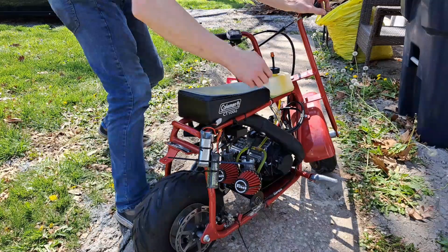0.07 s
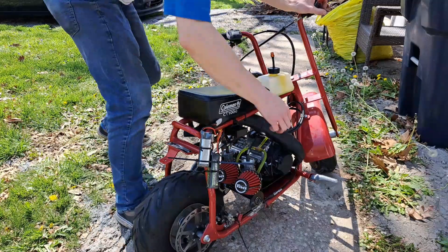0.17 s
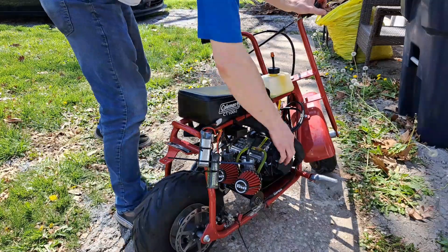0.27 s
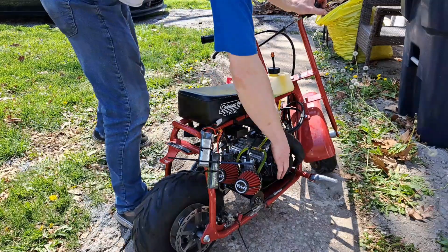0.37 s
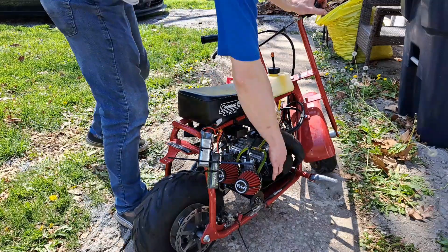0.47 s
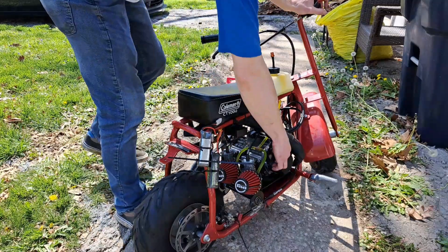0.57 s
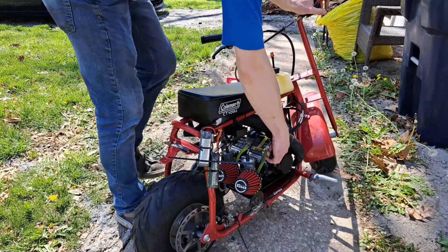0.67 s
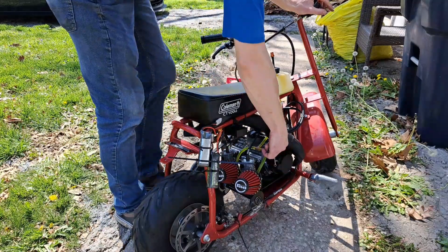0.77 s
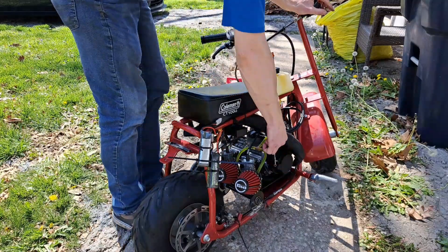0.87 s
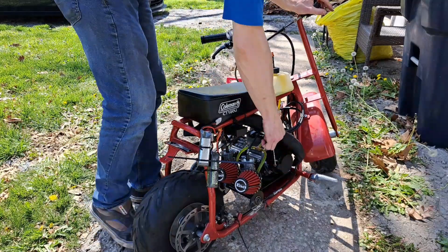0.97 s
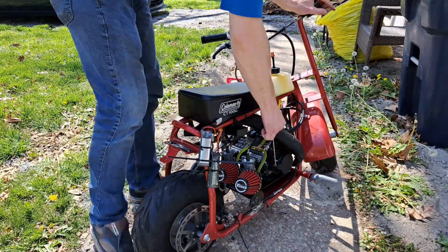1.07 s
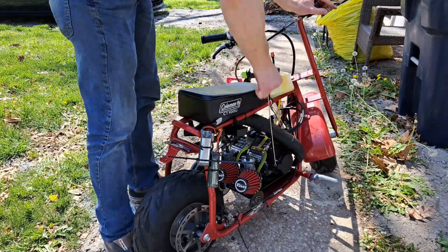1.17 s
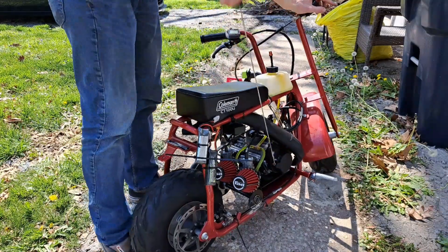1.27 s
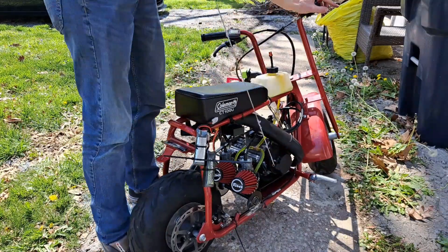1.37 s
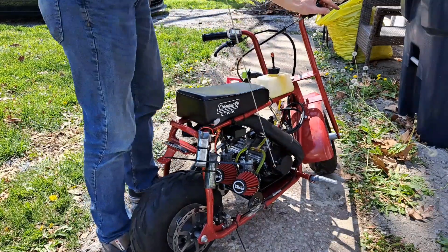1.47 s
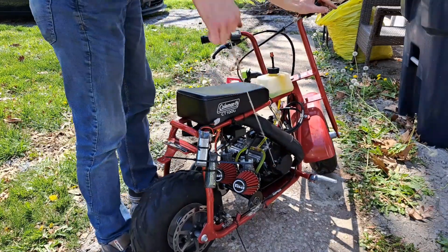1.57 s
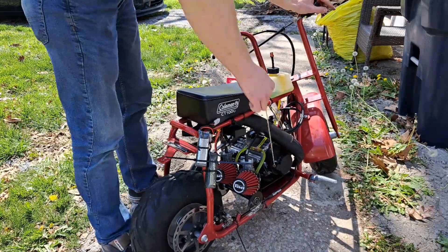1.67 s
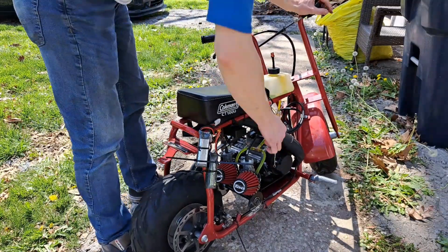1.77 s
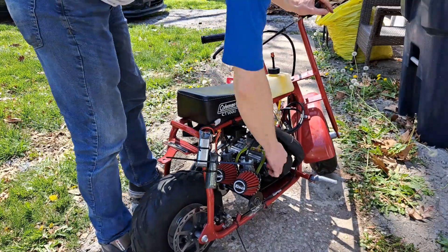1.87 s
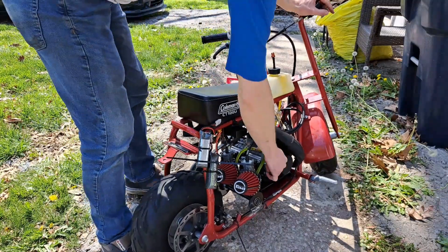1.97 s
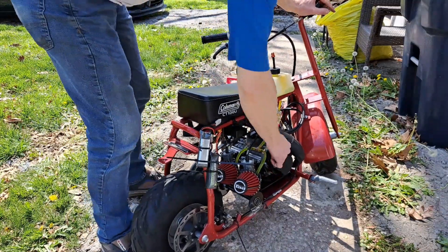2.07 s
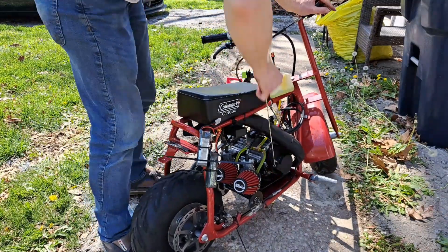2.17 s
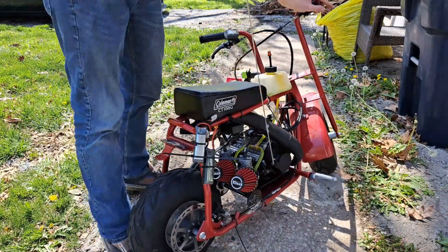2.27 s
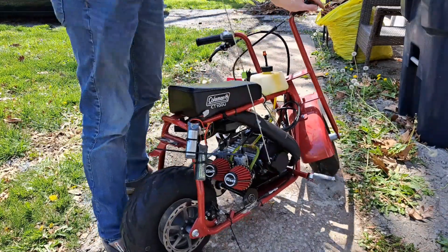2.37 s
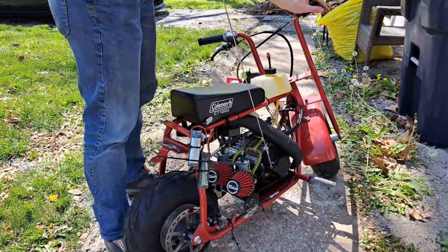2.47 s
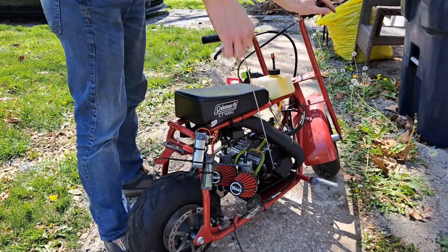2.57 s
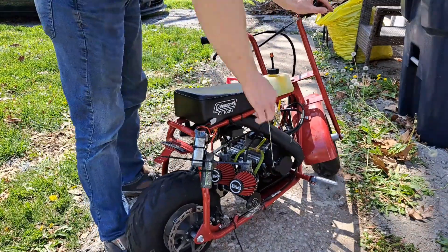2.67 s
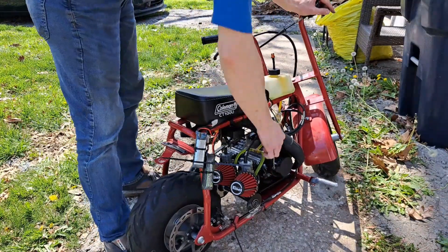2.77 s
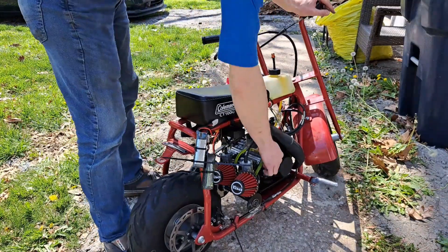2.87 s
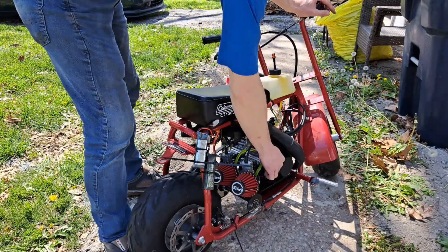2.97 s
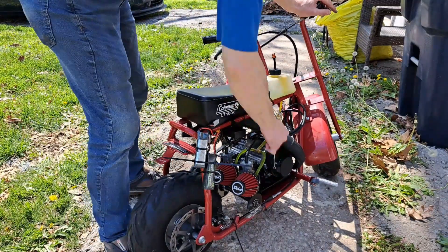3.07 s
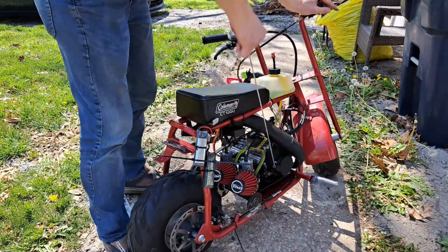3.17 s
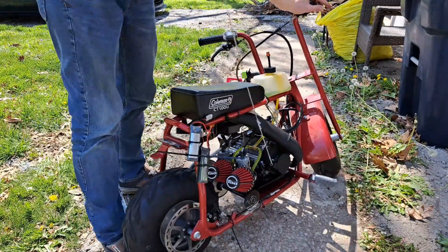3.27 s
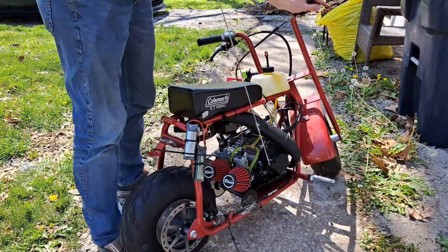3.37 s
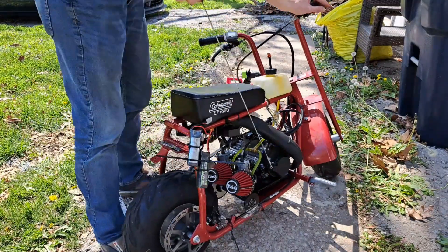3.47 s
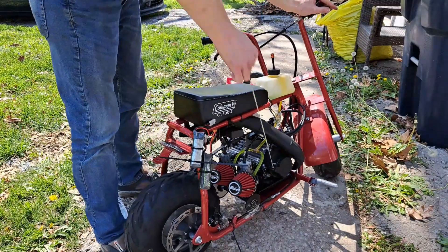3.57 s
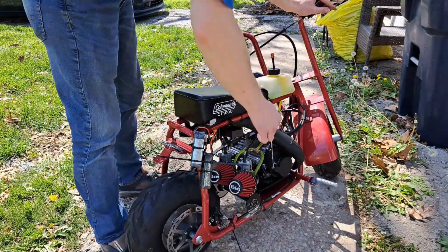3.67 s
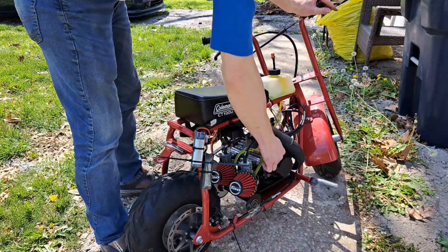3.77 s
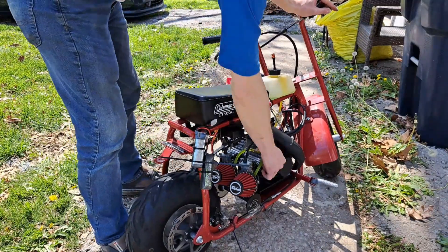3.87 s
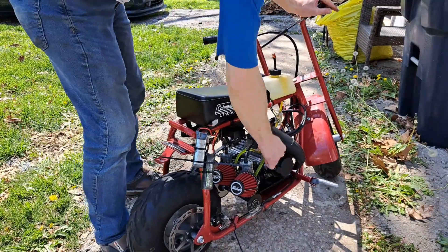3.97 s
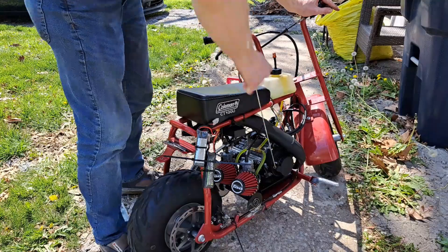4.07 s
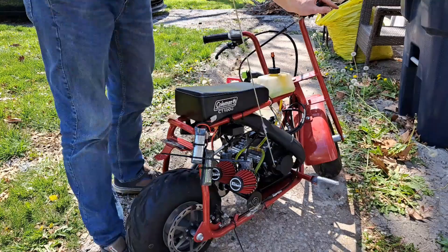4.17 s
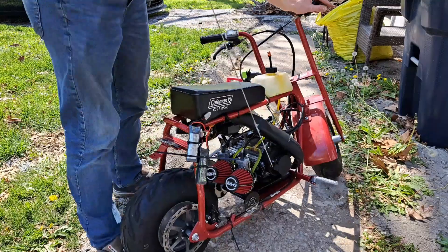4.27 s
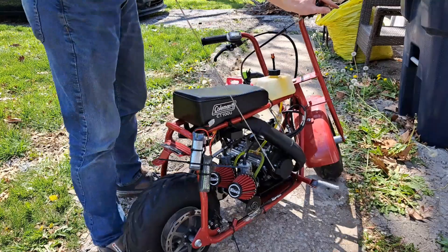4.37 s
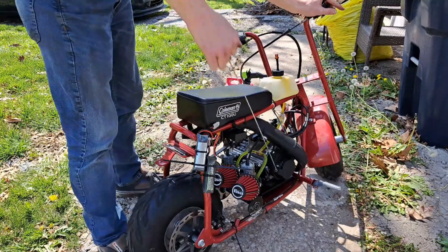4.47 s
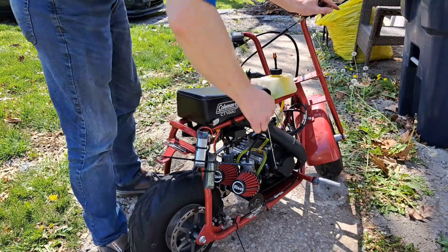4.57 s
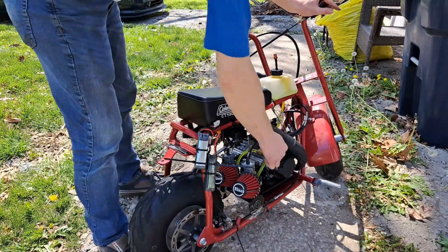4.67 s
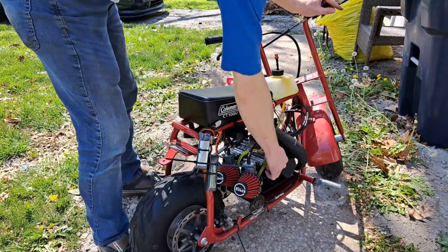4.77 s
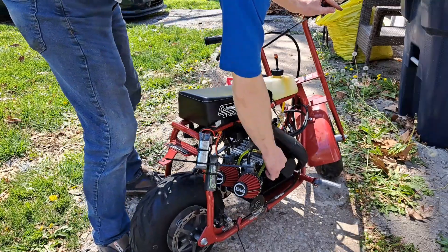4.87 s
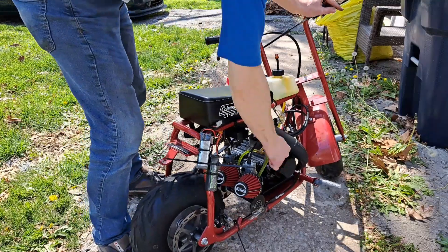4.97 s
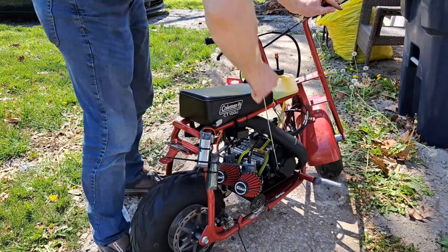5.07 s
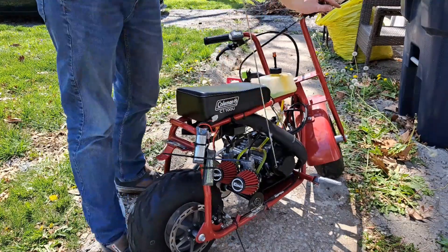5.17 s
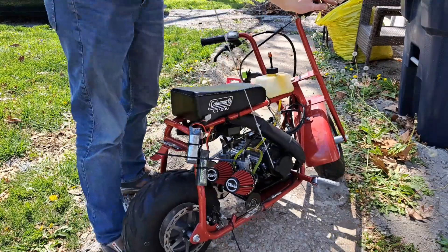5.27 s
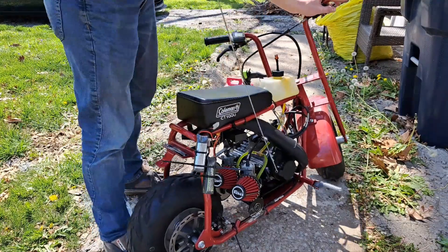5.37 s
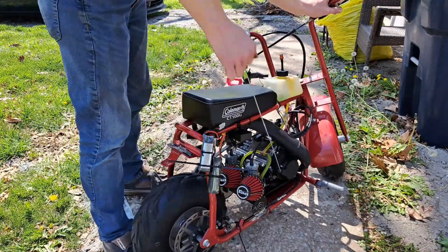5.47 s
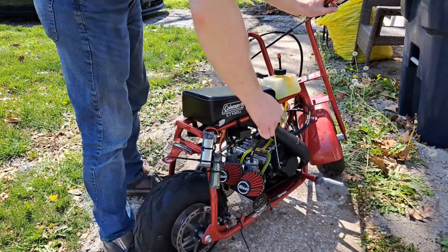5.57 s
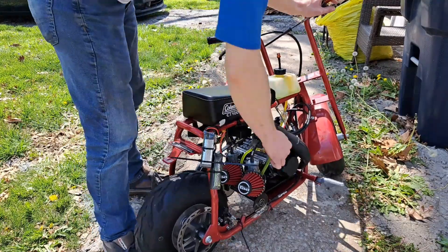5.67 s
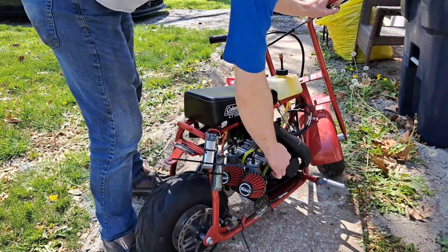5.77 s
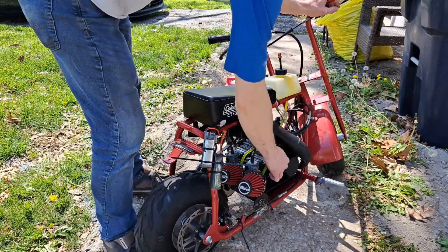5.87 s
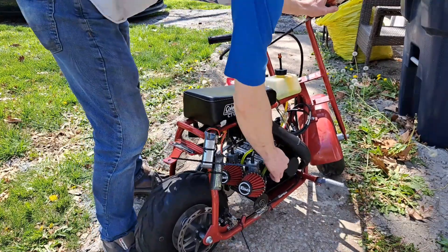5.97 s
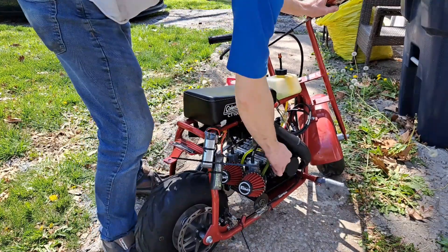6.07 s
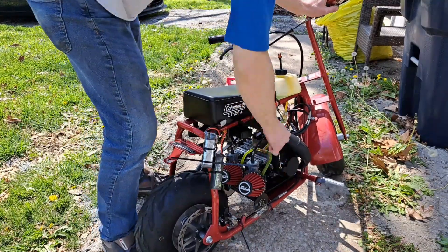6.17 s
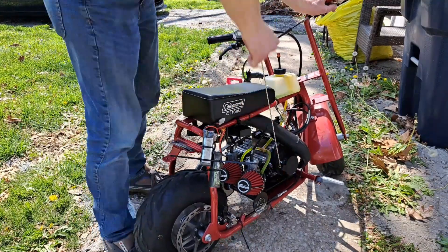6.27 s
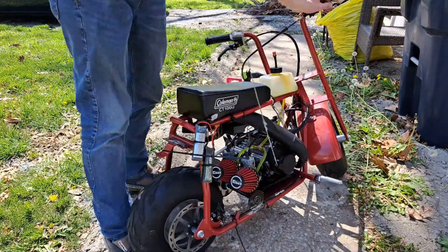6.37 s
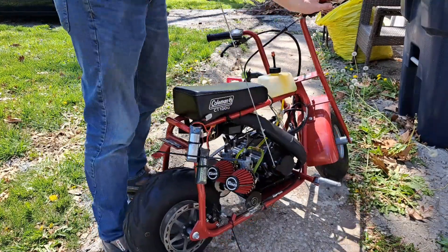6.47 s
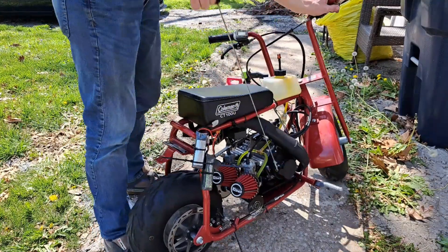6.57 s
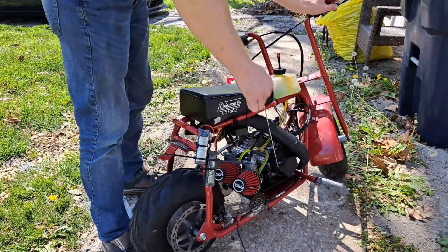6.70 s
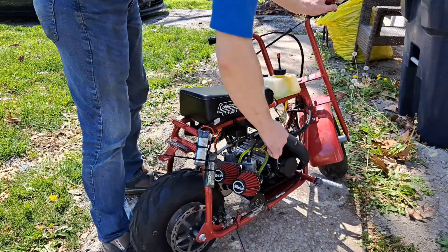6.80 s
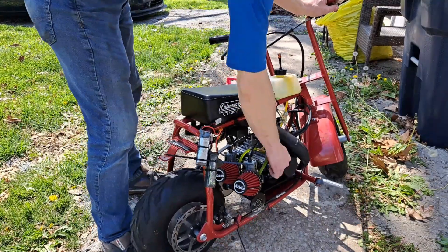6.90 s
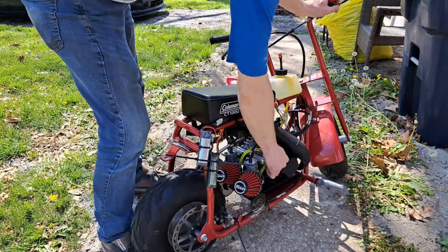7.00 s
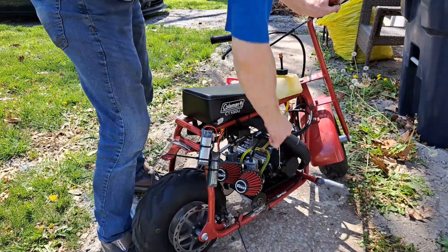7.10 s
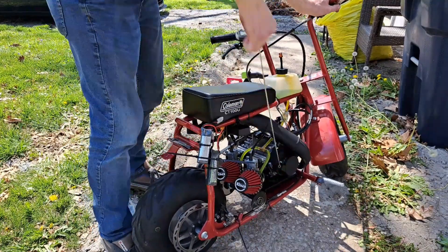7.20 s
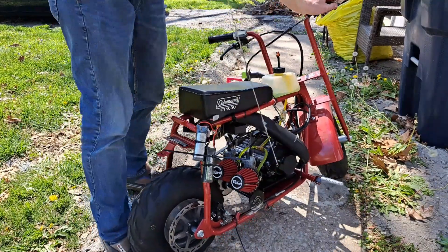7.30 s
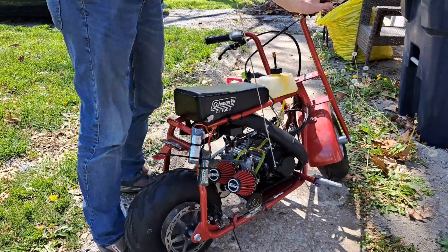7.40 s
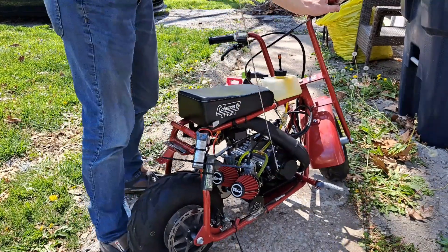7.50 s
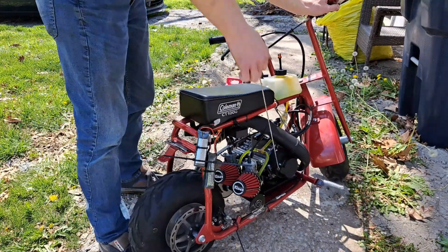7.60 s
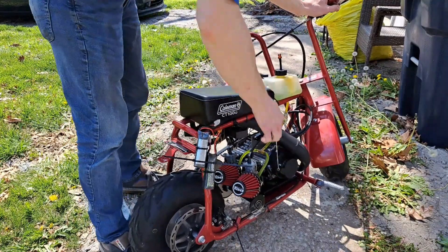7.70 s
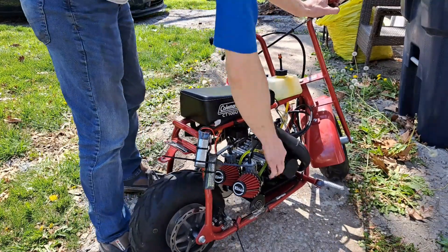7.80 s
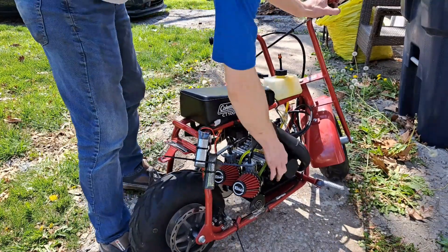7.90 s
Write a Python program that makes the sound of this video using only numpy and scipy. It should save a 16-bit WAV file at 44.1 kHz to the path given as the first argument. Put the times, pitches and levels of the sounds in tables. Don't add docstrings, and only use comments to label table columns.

```python
import sys
import numpy as np
from scipy import signal
from scipy.fft import rfft, irfft
from scipy.io import wavfile
from scipy.ndimage import uniform_filter1d

SR = 44100
rng = np.random.default_rng(int(sys.argv[2]) if len(sys.argv) > 2 else 0)


def boost_factor(decibels):
    exponent = np.asarray(decibels, float) / 20
    return 10 ** exponent


def waveform_to_disk(signal):
    frames = np.transpose(np.atleast_2d(signal))
    scaled = np.clip(frames, -1, 1) * 32767
    samples = np.round(scaled).astype(np.int16)
    wavfile.write(sys.argv[1], SR, samples)


N = 350154
TIME = np.arange(N) / SR

# (cord taut [s], stroke [s], whirr [dB], shroud hoot [dB], frame shake [dB])
STROKES = [(1.26, 0.25, -11, -18.5, -10.5), (2.235, 0.22, -12, -17.5, -11),
           (3.205, 0.25, -11.5, -15.5, -11.5), (4.13, 0.2, -14, -16.5, -9), (5.15, 0.2, -13, -17, -10),
           (6.305, 0.23, -14.5, -14, -10.5), (7.235, 0.22, -13.5, -11.5, -11.5)]
# (first tooth [s], last tooth [s], last gap [ms], rattle [dB], every other tooth [dB])
COASTING = [(1.574, 1.916, 43.5, -8.5, 2), (2.442, 2.896, 43.4, -9, 0.5), (3.568, 3.849, 44.3, -9, 0),
            (4.426, 4.765, 38.4, -10, 1.5), (5.428, 5.768, 45, -9.5, -1.5), (6.599, 6.934, 36.2, -9.5, 1.5),
            (7.54, 7.892, 45, -10, 0.5)]
# (frequency [Hz], width [Hz], level [dB])
HOUSING_MODES = [(1623, 28, -1.5), (2314, 89, 2.5), (2666, 190, 1), (3856, 88, 2), (4710, 130, 5.5),
                 (5024, 58, 7.5), (6820, 76, -4), (8930, 90, -6.5), (10580, 1500, -8.5)]
# (frequency [Hz], width [Hz], level [dB])
CRANKCASE_MODES = [(679, 18, -0.5), (810, 120, -3), (990, 35, -8)]
# (frequency [Hz], density [dB per Hz])
IMPACT_SPECTRUM = [(150, -63.5), (250, -5.5), (474, -21.5), (583, -5.5), (1850, -4.5), (2320, -5),
                   (4100, -3.5), (4790, -7), (13000, -19), (15500, -13)]


def unit(x):
    return x / np.sqrt(np.mean(x ** 2))


def noise():
    return rng.standard_normal(N)


def band(x, lo_hz, hi_hz, order=3):
    return signal.sosfilt(signal.butter(order, [lo_hz, hi_hz], "band", fs=SR, output="sos"), x)


def colour(x, points):
    hz, db = np.transpose(points)
    grid_hz = np.arange(1025) * SR / 2048 + 1
    log_gain = np.interp(np.log(grid_hz), np.log(hz), db) * np.log(10) / 20
    cepstrum = irfft(log_gain)
    cepstrum[1:1024] *= 2
    cepstrum[1025:] = 0
    impulse = irfft(np.exp(rfft(cepstrum)))
    return signal.fftconvolve(x, impulse)[:N]


def modes(x, table):
    return sum(boost_factor(db) * signal.lfilter(*signal.iirpeak(hz, hz / width, SR), x) for hz, width, db in table)


def walk(rate):
    k = int(SR / rate)
    steps = np.repeat(rng.standard_normal(N // k + 1), k)
    return 1.18 * uniform_filter1d(steps, k)[:N]


def add(out, s, piece):
    i = max(int(s * SR), 0)
    out[i:i + len(piece)] += piece[:N - i]


def ramp(s, length, up, down):
    return np.minimum(np.minimum((TIME - s) * up, (s + length - TIME) * down), 0)


def bursts(table, rise, fall, scatter_db):
    t, out = np.arange(9000) / SR, np.zeros(N)
    for (s, db), chance in zip(table, rng.standard_normal(len(table))):
        dying = np.exp(-t / (fall * boost_factor(scatter_db * chance)))
        dying += 0.09 * np.exp(-t / (2.6 * fall))
        add(out, s - rise / 2, boost_factor(db) * (1 - np.exp(-t / rise)) * dying)
    return out


def patchy(x, rate, depth_db):
    edges = 300 * 2. ** np.arange(7) * [1, 1, 1, 1, 1, 1, .84]
    out = 0
    for k in range(6):
        octave = band(x, edges[k], edges[k + 1], order=2)
        out = out + (-1) ** k * octave * boost_factor(depth_db * walk(rate))
    return out


def rustle():
    # (time [s], length [s],
    # dull rustle [dB], bright rustle [dB])
    movements = [(0, 0.26, -36, -37), (0.113, 0.045, -28.5, -33.5), (0.163, 0.038, -61.5, -39.5),
                 (0.359, 0.053, -51.5, -42), (0.448, .09, -57, -56), (0.555, 0.035, -50.5, -39),
                 (0.584, 0.19, -49, -41.5), (0.873, 0.084, -30, -33.5), (1.0, 0.12, -49, -79),
                 (1.172, 0.056, -15, -29), (1.92, 0.015, -13.5, -37), (1.97, 0.11, -27.5, -50.5),
                 (2.094, 0.21, -20, -44), (2.924, 0.026, -21, -64), (3, 0.078, -38, -40),
                 (3.074, 0.034, -19.5, -53), (3.138, 0.044, -28, -36), (3.91, 0.11, -58, -44),
                 (4.004, 0.13, -25, -36), (4.797, .02, -30.5, -60.5), (4.853, 0.12, -64, -97),
                 (5.006, 0.029, -30.5, -68), (5.098, 0.034, -23.5, -43.5), (5.88, 0.44, -62.5, -70.5),
                 (6.244, .04, -57, -70), (6.956, 0.0077, -18.5, -42), (7.0, 0.046, -67, -49.5),
                 (7.098, 0.15, -27.5, -44.5)]
    # (frequency [Hz], density [dB per Hz])
    cloth_spectrum = [(300, -16), (600, -15.5), (1800, -20), (4500, -32.5), (15500, -12)]
    # (frequency [Hz], width [Hz], level [dB])
    grip_modes = [(2590, 150, -5.5), (3640, 590, -0.5), (5900, 2200, 8.5), (10030, 500, 7.5),
                  (13200, 1500, 6)]
    dull, bright = np.zeros(N), np.zeros(N)
    for s, length, dull_db, bright_db in movements:
        move = boost_factor(ramp(s, length, 592.5, 448.5))
        dull += move * boost_factor(dull_db)
        bright += move * boost_factor(bright_db)
    slips = noise() * boost_factor(1.8 * walk(50) + 2.5 * walk(400))
    cloth = unit(colour(slips, cloth_spectrum)) + 1.2 * unit(modes(slips, grip_modes))
    low = dull * boost_factor(-9.5) * unit(band(cloth, 370, 2700))
    return low + bright * boost_factor(-3.5) * unit(band(cloth, 6300, 19000))


def hiss():
    return boost_factor(-92.5) * band(noise(), 200, 4000, order=1)


def frame_tremble():
    # (time [s], length [s], level [dB], decay [dB per s])
    tremors = [(0, 0.013, -11.5, 126), (0.527, 0.05, -50.5, 151.5), (1.08, 0.52, -22.5, 231),
               (2.44, 0.048, -14.5, 61), (3.393, 0.24, -25.5, 193), (4.348, 0.14, -18, 220),
               (5.35, 0.054, -24, 124), (5.568, 0.13, -30, 197), (6.536, 0.24, -24, 290),
               (7.45, 0.26, -25, 270)]
    still_db = -62.5
    level = boost_factor(still_db) + sum(boost_factor(db + ramp(s, length, 210, down)) for s, length, db, down in tremors)
    return level * boost_factor(-1.5 + 3.5 * walk(25)) * unit(band(noise(), 45, 125, order=4))


def ticks():
    # (time [s], peak [dB])
    contacts = [
        (0.0229, 1.5),
        (5.9609, -43.5),
        (6.1185, -44.5),
    ]
    return boost_factor(-9.5) * band(noise(), 500, 11000, order=1) * bursts(contacts, 0.0002, 0.004, 3.0)


def frame_blows():
    # (time [s], peak [dB], frequency [Hz], length [ms])
    handling = [(0.025, 3.5, 69.4, 29), (0.075, -12, 55, 2.3), (0.155, -3, 88.4, 28), (0.191, -2, 93.5, 20),
                (0.449, -34, 94, 33), (0.865, -1.5, 68, 23), (0.936, -9.5, 91, 18), (0.961, -5, 71, 24),
                (1.048, 0, 63.4, 28), (1.152, 2, 63.3, 30.5), (1.867, -10, 73, 22), (2.001, -21, 94.5, 11),
                (3.063, -16.5, 84, 21), (5.012, -26.5, 78.4, 31), (5.044, -21.5, 86.5, 13),
                (3.035, -22.5, 90, 15), (2.025, -23.5, 90, 14), (5.919, -7, 83, 7.1),
                (6.193, -17.5, 78, 29), (6.972, -10.5, 71.5, 22.5), (7.055, -22.5, 73, 20)]
    # (time [s], peak [dB])
    cord_yanks = [(1.225, 1), (2.232, -6), (3.183, -8.5), (4.082, -4), (5.138, -8.5), (6.239, -4.5),
                  (6.282, -6.5), (7.198, -5)]
    # (time [s], peak [dB])
    piston_jolts = [(1.61, -21.5), (1.66, -8), (1.707, -13), (2.579, -10), (2.669, -27), (2.72, -14.5),
                    (2.825, -21.5), (3.589, -23.5), (3.628, -14.5), (4.466, -4), (4.512, -14), (4.577, -12),
                    (5.616, -7), (5.675, -10), (6.6, -10), (6.643, -6.5), (6.729, -18), (6.806, -2),
                    (7.597, -14.5), (7.639, -13.5), (7.666, -9.5)]
    # (time [s], peak [dB])
    cracks = [(0.023, -7.5), (0.849, -21), (1.866, -14), (5.917, -50), (6.969, -14)]
    yank_hz, yank_ms = 84, 18
    jolt_hz, jolt_hz_per_db, jolt_ms = 68.1, -0.6, 16.4
    blows = handling + [(s, db, yank_hz, yank_ms) for s, db in cord_yanks]
    blows += [(s, db, jolt_hz + jolt_hz_per_db * db, jolt_ms) for s, db in piston_jolts]
    out, t = np.zeros(N), np.arange(9000) / SR
    for (s, db, hz, ms), turn in zip(blows, rng.random((len(blows), 2))):
        u = t / (ms / 1000 / 4.3)
        phase = 2 * np.pi * (hz * t + turn[0])
        swing = u ** 2 * np.exp(2 - u) / 4 * np.sin(phase)
        front = 0.35 * u * np.exp(1 - 1.026 * u) * np.sin(2.4 * phase + 2 * np.pi * turn[1])
        add(out, s - ms / 1000 * 0.23, boost_factor(db) * (swing + front))
    scuff = boost_factor(-25.5) * bursts([row[:2] for row in blows], 0.0022, 0.011, 3.3)
    scuff += bursts(cracks, 0.0028, 0.0058, 1.1)
    return out + scuff * unit(band(noise(), 270, 460, order=1))


def steel_rings():
    # (time [s], level [dB], decay by 60 dB [s])
    ringing = [(.08, -33, .15), (.07, -44, .15), (.09, -38, .3), (2.86, -36, 1.4), (3.5, -37, .9),
               (3.85, -39, .9), (3.89, -43, .6), (4.77, -56, .6), (5.85, -54, .5)]
    pitches = [6200, 8950, 3790, 3768, 3768, 3768, 1599, 2056, 3117]
    out, t = np.zeros(N), np.arange(SR) / SR
    for (s, db, t60), hz in zip(ringing, pitches):
        onset = np.minimum(t / 0.0034, 1)
        add(out, s, boost_factor(db - 60 * t / t60) * np.sin(2 * np.pi * hz * t) * onset)
    return out


def stroke_progress():
    times = [t for s, d, *_ in STROKES for t in (s, s + d, s + d + .25)]
    return np.interp(TIME, times, [0, 1, 1] * len(STROKES))


def swing_phase(along):
    start_hz, end_hz = 73.9, 67.87
    hz = start_hz + (end_hz - start_hz) * along
    return 2 * np.pi * np.cumsum(hz * (1 + 0.0925 * walk(45))) / SR


def cord_snatches():
    # (time [s], peak [dB])
    jerks = [(1.263, -9.5), (1.48, 10.5), (1.497, -6), (2.248, -2.5), (2.435, -1.5), (3.215, 1),
             (3.421, 0.5), (3.44, 5.5), (4.135, 5.5), (4.152, 6.5), (5.148, 3), (5.36, 6), (6.316, -13),
             (6.334, 9.5), (7.237, 0), (7.255, -2.5)]
    return unit(band(noise(), 440, 3200, order=1)) * bursts(jerks, 0.0021, 0.009, 0.64) * boost_factor(-14.5)


def flywheel_whirr(along, phase, puffs):
    # (frequency [Hz], density [dB per Hz])
    whirr_spectrum = [(320, -15.5), (550, -5.5), (1290, -7), (1570, -4), (4050, -9.5), (4790, -9),
                      (5830, -15), (7500, -17.5), (15500, -22)]
    treble_db = -11 + 6.5 * along
    effort = boost_factor(1.5 * walk(18) - 1.5 * np.sin(np.pi * along))
    spin_up_db_s, let_go_db_s = 515.5, 150
    spin = effort * sum(boost_factor(db + ramp(s, d, spin_up_db_s, let_go_db_s)) for s, d, db, _, _ in STROKES)
    slack_db = np.max([ramp(s - .3, d + 0.31, 1000, 249) for s, d, *_ in STROKES], axis=0).clip(-11)
    grind = boost_factor(2.8 * walk(60) + 0.98 * walk(220))
    air = colour(noise() * (1 - 0.14 * np.sin(phase)) * grind, whirr_spectrum)
    tin = unit(modes(air, HOUSING_MODES)) * boost_factor(0.58 * treble_db)
    air = unit(air) + 0.15 * tin + 0.49 * unit(modes(puffs, CRANKCASE_MODES))
    air = patchy(air, 90, 1.8)
    treble = boost_factor(treble_db + slack_db) * unit(band(air, 3870, 20000))
    return spin * (unit(band(air, 440, 4500)) + treble)


def frame_shake(along, phase):
    lag_s, up_db_s, down_db_s, sag_db = 0.033, 375, 145, -4
    level = sum(boost_factor(db + ramp(s + lag_s, d - lag_s, up_db_s, down_db_s)) for s, d, _, _, db in STROKES)
    shake = np.sin(phase) + 0.35 * boost_factor(2.1 * walk(40)) * np.sin(2 * phase + 1.3)
    shake = unit(shake * boost_factor(3.6 * walk(35)))
    shake += 0.43 * unit(band(noise(), 90, 350)) + 0.59 * unit(band(noise(), 40, 64.5))
    return boost_factor(sag_db * along) * level * shake


def shroud_puffs(phase):
    return noise() * (0.11 + np.exp(-1.5 * np.sin(phase)))


def shroud_hoot(puffs):
    cavity_hz = [396, 365.5, 372, 373.4, 405, 433, 425]
    lag_s, up_db_s, down_db_s = 0.055, 278, 331
    out = np.zeros(N)
    for (s, d, _, db, _), hz in zip(STROKES, cavity_hz):
        tone = unit(modes(modes(puffs, [(hz, 60, 0)]), [(hz, 110, 0)]))
        out += boost_factor(db + ramp(s + lag_s, d - lag_s, up_db_s, down_db_s)) * tone
    return out


def teeth():
    tooth_counts = [14, 19, 12, 15, 14, 15, 15]
    # (time [s], rattle [dB])
    last_tips = [(3.887, -22), (5.84, -13.5), (7.932, -26)]
    slowing, jitter_s, scatter_db, bite_db = 0.477, 0.0017, 0.5, -11
    rows = list(last_tips)
    for (first, last, ms, db, uneven_db), count in zip(COASTING, tooth_counts):
        stretch = slowing ** np.arange(count - 1)
        even = (last - first - ms / 1000 * stretch.sum()) / (count - 1 - stretch.sum())
        s = last - np.append(0, np.cumsum(even + (ms / 1000 - even) * stretch))
        back, chance = np.arange(count), rng.standard_normal((2, count))
        level = db + uneven_db * (-1) ** back + bite_db * (back / count) ** 4 + scatter_db * chance[0]
        rows += zip(s + jitter_s * chance[1] * (back > 0), level)
    return rows


def pawl_rattle():
    chatter_db, share = -17.5, 0.51
    chatter = sum(boost_factor(db + chatter_db + ramp(s, (end - s) * share, 502, 130.5))
                  for s, end, _, db, _ in COASTING)
    chatter = chatter * boost_factor(2.1 * walk(120))
    strikes = bursts(teeth(), 0.0042, 0.0085, 0.93) + chatter
    grit = unit(noise() * boost_factor(1.6 * walk(900))) * strikes
    scatter_db = 2.8
    ring = sum(modes(grit * boost_factor(scatter_db * walk(45)), [mode]) for mode in HOUSING_MODES)
    rattle = boost_factor(6.5) * patchy(colour(grit, IMPACT_SPECTRUM), 45, 1.9)
    crankcase = modes(grit * boost_factor(scatter_db * walk(30)), CRANKCASE_MODES)
    return rattle + boost_factor(9.0) * ring + boost_factor(0.5) * crankcase


def handle_clacks():
    # (time [s], peak [dB])
    handle_knocks = [(2.0935, -15), (2.114, -15.5), (3.0625, -12.5), (3.0824, -24), (4.011, -5.5),
                     (4.0731, -10.5), (4.9895, -21), (5.011, -20.5), (7.1, -23.5)]
    # (frequency [Hz], width [Hz], level [dB])
    cup_modes = [(1535, 61, 1.5), (2260, 290, -5), (4400, 210, -1), (4840, 40, 11), (6940, 80, -26.5)]
    clack = noise() * bursts(handle_knocks, 0.00025, 0.009, 0.8)
    return boost_factor(6.5) * modes(clack, cup_modes) + boost_factor(-18.5) * colour(clack, IMPACT_SPECTRUM)


def choke(air):
    # (time [s], depth [dB], length [ms])
    overloads = [(1.28, 28, 8.9), (1.308, 16.5, 5.4), (1.331, 19, 7.1), (1.447, 19, 6.2),
                 (2.234, 12.5, 3.2), (2.271, 16.5, 5.5), (2.302, 12.5, 4.5), (2.321, 12, 22),
                 (2.344, -6.5, 3.4), (2.426, 15.5, 7.4), (3.41, 17.5, 8.4), (4.323, 17.5, 10),
                 (4.361, 23, 4.2), (4.465, 18, 4.6), (6.363, 12, 4), (6.8, 16.5, 8.1), (7.479, 21.5, 5.7)]
    depth_db = sum(db * np.clip(1.4 - 2 * abs(TIME - s) / (ms / 1000), 0, 1) for s, db, ms in overloads)
    return boost_factor(-depth_db) * air


def stereo_flutter(mid, sharp):
    flutter = np.clip(walk(20) - .9, 0, .4)
    side = boost_factor(-17.5) * np.roll(mid, 300)
    side += boost_factor(-10) * band(np.roll(mid, 250), 180, 700, order=1)
    side += boost_factor(-21) * band(np.roll(sharp, 200), 8000, 15000, order=1)
    return np.array([mid + flutter * side, mid - flutter * side])


def scene():
    handling = rustle() + hiss() + ticks() + steel_rings()
    along = stroke_progress()
    phase = swing_phase(along)
    puffs = shroud_puffs(phase)
    pulling = cord_snatches() + flywheel_whirr(along, phase, puffs) + shroud_hoot(puffs)
    sharp = choke(handling + pulling + pawl_rattle() + handle_clacks())
    mid = frame_tremble() + frame_blows() + frame_shake(along, phase) + sharp
    return stereo_flutter(mid, sharp)


def low_pass(x):
    return signal.sosfilt(signal.butter(12, 15780, fs=SR, output="sos"), x)


def record(dry):
    bass_cut = signal.butter(2, 36, "high", fs=SR, output="sos")
    top_cut = signal.ellip(8, .2, 60, 15750, fs=SR, output="sos")
    limited = np.tanh(1.19 * signal.sosfilt(bass_cut, dry)) / 1.108
    return low_pass(signal.sosfilt(top_cut, limited))


dry = scene()
out = record(dry)
waveform_to_disk(out)
```